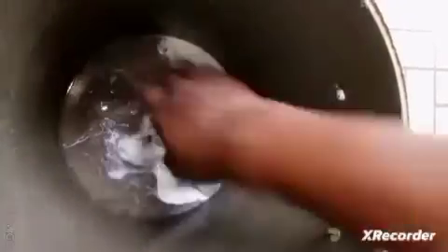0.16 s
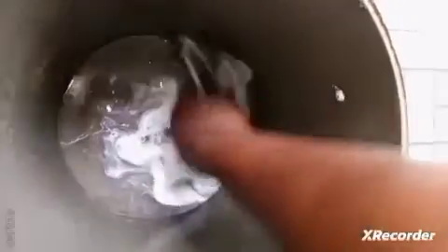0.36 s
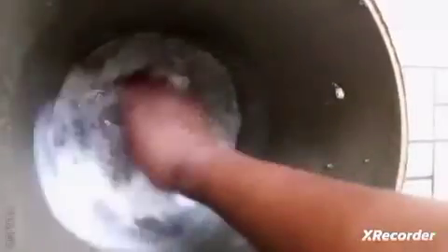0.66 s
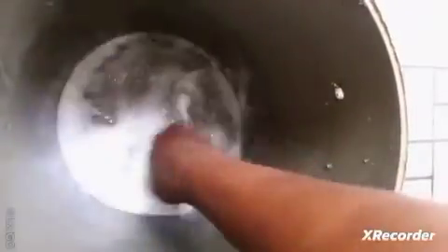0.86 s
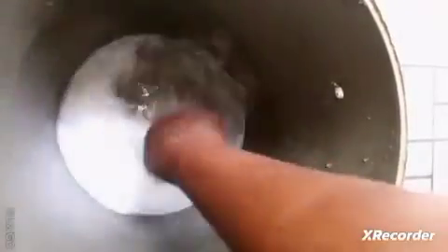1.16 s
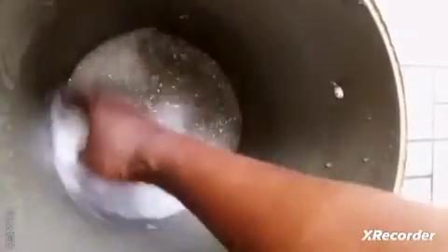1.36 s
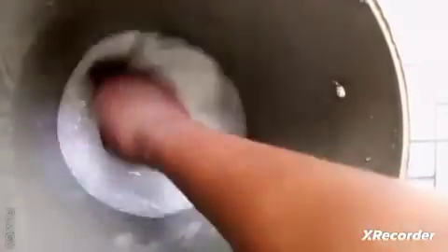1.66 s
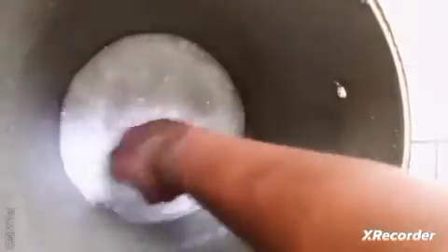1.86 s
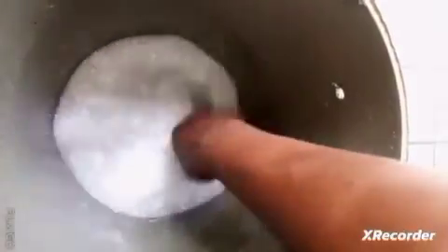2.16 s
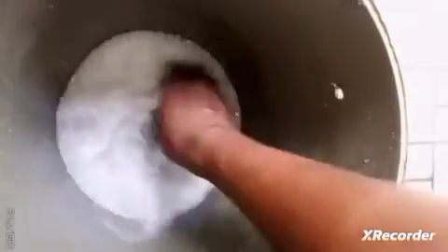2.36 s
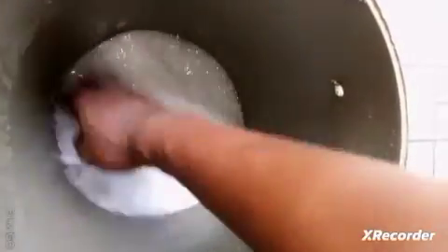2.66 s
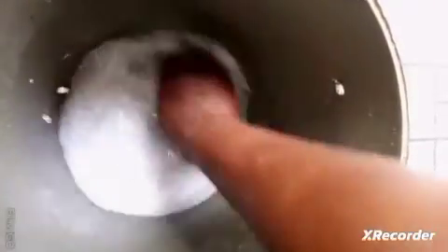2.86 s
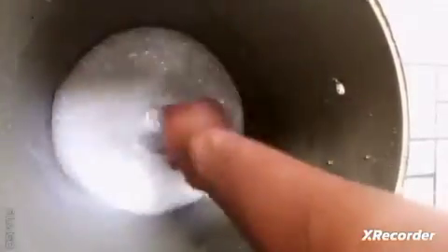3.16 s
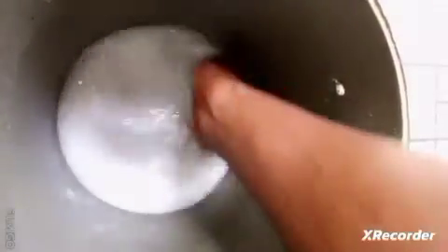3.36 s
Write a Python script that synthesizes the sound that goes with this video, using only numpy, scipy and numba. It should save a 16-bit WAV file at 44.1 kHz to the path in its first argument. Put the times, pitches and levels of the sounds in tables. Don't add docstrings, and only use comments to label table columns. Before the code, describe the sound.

Shallow water is stirred by hand in a bucket: a brief quiet lead-in, a sharp first splash, then continuous churning, glugs and bubbly splashes with dull hollow thumps, miked close over the rim outdoors.

```python
import sys
import numpy as np
from scipy import signal
from scipy.fft import rfft, irfft
from scipy.io import wavfile
from scipy.ndimage import uniform_filter1d, minimum_filter1d
from numba import njit

SR = 44100
rng = np.random.default_rng(int(sys.argv[2]) if len(sys.argv) > 2 else 0)


def unload_audio(sound):
    columns = np.transpose(np.atleast_2d(sound))
    steps = np.round(np.clip(columns, -1, 1) * 32767)
    wavfile.write(sys.argv[1], SR, steps.astype(np.int16))


def ratio_of_db(decibels):
    return 10 ** (np.asarray(decibels, float) / 20)


N = 154350

BUBBLE_GLIDE, BUBBLE_SWELL_CYCLES = 0.035, 2.13
SURGE_DB = 2


def level(x, rms_db):
    return x * ratio_of_db(rms_db) / np.sqrt(np.mean(x ** 2))


def colour(x, points):
    hz, db = np.array(points, float).T
    grid_hz = np.arange(1025) * SR / 2048
    gain_db = np.interp(np.log(grid_hz + 1), np.log(hz), db)
    cepstrum = irfft(gain_db * np.log(10) / 20)
    cepstrum[1:1024] *= 2
    cepstrum[1025:] = 0
    impulse = irfft(np.exp(rfft(cepstrum)))
    return signal.fftconvolve(x, impulse)[:N]


def band(x, hz, width_hz):
    return signal.lfilter(*signal.iirpeak(hz, hz / width_hz, SR), x)


def band_twice(x, hz, width_hz):
    return band(band(x, hz, width_hz), hz, width_hz)


def cut(x, hz, kind, order):
    return signal.sosfilt(signal.butter(order, hz, kind, fs=SR, output="sos"), x)


def walk(rate_hz):
    hold = int(SR / rate_hz)
    steps = np.repeat(rng.standard_normal(N // hold + 1), hold)
    return 1.3 * uniform_filter1d(uniform_filter1d(steps, hold), hold)[:N]


def bursts(rows, decay_s, rise_s):
    kicks = np.zeros(N)
    kicks[(rows[:, 0] * SR).astype(int)] = ratio_of_db(rows[:, 1])
    n = int(rise_s * SR)
    rise = np.convolve(kicks, np.hanning(n) * 2 / n)[n // 3:n // 3 + N]
    return signal.lfilter([1], [1, -np.exp(-1 / (decay_s * SR))], rise)


@njit
def ring(start_s, hz, cycles, size, glide, swell_cycles):
    out = np.zeros(N)
    for k in range(len(start_s)):
        n0 = int(start_s[k] * SR)
        tau = cycles[k] / hz[k] * SR / 2
        phase = 0.0
        for i in range(min(int(5 * tau), N - n0)):
            phase += 2 * np.pi * hz[k] * (1 + glide[k] * i / tau / 2) / SR
            swell = min(i * hz[k] / SR / swell_cycles, 1.0)
            out[n0 + i] += size[k] * np.exp(-i / tau) * swell * np.sin(phase)
    return out


def cluster(rows, cycles, spread_s, gain_db):
    bubbles, swarm_db, lead_db = 12, -7, 8.5
    when, pitch, strength, life = np.moveaxis(rng.random((len(rows), bubbles, 4)), 2, 0)
    late_s = -spread_s * np.log(1 - when)
    size = ratio_of_db(rows[:, 1:2] + gain_db + swarm_db + 11 * strength) * np.exp(-late_s / spread_s / 2)
    hz = rows[:, 2:3] * 2 ** (1.497 * (pitch - 0.55))
    late_s -= 0.001
    late_s[:, 0] = 0
    size[:, 0] = ratio_of_db(rows[:, 1] + gain_db + lead_db)
    hz[:, 0] = 0.99 * rows[:, 2]
    life[:, 0] = 1
    start_s = rows[:, :1] + late_s
    cycles = cycles * (0.95 + 0.63 * life)
    return ring(start_s.ravel(), hz.ravel(), cycles.ravel(), size.ravel(),
                BUBBLE_GLIDE * life.ravel(), BUBBLE_SWELL_CYCLES)


# (time [s], peak level [dB], pitch [Hz])
SPLASHES_EARLY = [(0.3312, -15, 2740), (0.3931, 0, 3400), (0.4845, -26, 3400), (0.5852, -35, 3600),
                  (0.611, -40, 3600), (0.6221, -8.5, 3160), (0.7234, -8, 4050), (0.7618, -23, 3020),
                  (0.797, -34, 2730), (0.9234, -22, 3530), (0.9588, -1.5, 3160), (1.0017, -4.5, 2420),
                  (1.0589, -6, 3260), (1.099, -8.5, 2550), (1.117, -15, 3300), (1.1386, -4, 3350),
                  (1.1782, -13.5, 3750), (1.218, -10, 2900), (1.2404, -8, 3430), (1.2806, -9, 3720),
                  (1.31, -40, 3170), (1.3335, -0.5, 2227), (1.4343, -9.5, 2280), (1.4748, -16, 3130),
                  (1.517, -11, 4000), (1.558, -3, 2434), (1.6039, -8, 2510), (1.6304, -3.5, 3530),
                  (1.6957, -11, 3500), (1.7126, -6.5, 2010), (1.745, -4, 3250), (1.7798, -9, 3400)]
SPLASHES_LATE = [(1.847, -9.5, 3270), (1.926, -17, 2520), (1.962, -22, 3300), (1.9743, -10, 4300),
                 (2.0353, -16, 2500), (2.0727, -27, 4270), (2.1004, -18.5, 3530), (2.1414, -1, 2890),
                 (2.2289, -5.5, 2870), (2.2656, -1, 2435), (2.375, -4, 3090), (2.401, -14, 3780),
                 (2.4678, -17, 3710), (2.5152, -8.5, 2230), (2.623, -5.5, 3480), (2.7082, -10.5, 3370),
                 (2.7447, -22, 3200), (2.778, -42, 2330), (2.8261, -9.5, 3470), (2.8811, -12, 3260),
                 (3.0173, -9, 2580), (3.056, -5, 2075), (3.1012, 6, 2870), (3.1907, -6.5, 3330),
                 (3.312, -23, 3930), (3.3328, -9, 3290), (3.4206, -8, 2780), (3.485, -11.5, 2600)]


def splashes():
    rows = np.array(SPLASHES_EARLY + SPLASHES_LATE)
    return cluster(rows, cycles=19.6, spread_s=0.0073, gain_db=-7.5)


# (time [s], peak level [dB], pitch [Hz])
GLUGS = [(0.33, -2.5, 1484), (0.486, -9, 766), (0.521, -3.5, 831), (0.637, -13, 1044),
         (0.708, -9, 705), (0.809, -9.5, 1570), (0.828, -11, 804), (0.847, -8, 1016),
         (0.92, -13, 1490), (0.961, -12, 1420), (1.002, -34, 1400), (1.184, -11.5, 1030),
         (1.24, -9.5, 1500), (1.309, -12.5, 772), (1.347, -13.5, 1650), (1.432, -3, 1785),
         (1.524, -10, 1950), (1.594, -12, 1440), (1.692, -14.5, 1800), (1.708, -9, 1820),
         (1.775, -8, 1810),
         (1.943, -10.5, 1490), (1.971, -11, 942), (1.994, -8, 1116), (2.059, -14, 1083),
              (2.14, -14, 1062), (2.226, -9, 1310), (2.265, -6, 1633), (2.514, -12, 1730),
              (2.681, -18, 1440), (2.749, -15, 1290), (2.775, -12, 1470), (2.801, -6.5, 1455),
              (2.833, -10, 1058), (2.867, -5, 1650), (2.941, -32.5, 725), (2.995, -12.5, 872),
              (3.027, -4.5, 1510), (3.099, 3, 1594), (3.329, -20, 1030)]


def glugs():
    rows = np.array(GLUGS)
    return cluster(rows, cycles=8.7, spread_s=0.014, gain_db=-2.36)


# (time [s], churn level [dB], spray relative level [dB])
STIRRING = [(.326, -21.5, -19), (0.398, -4.5, 7), (0.434, -20, 2), (0.498, -10.5, -2), (.72, -11, 1),
            (.9, -17.5, 3), (1.3, -17.5, 0), (1.75, -18.5, -7), (1.9, -22.5, 3.5), (2.029, -15.5, -2.5),
            (2.12, -24, -14), (2.372, -14, 1), (2.429, -32.5, -13), (2.6, -20.5, 4), (2.65, -16.5, 7),
            (3.122, -16, 1.5), (3.28, -24.5, 3), (3.5, -27, -31)]


def effort_db(column):
    rows = np.array(STIRRING, float)
    return np.interp(np.arange(N) / SR, rows[:, 0], rows[:, column], left=-99)


# (frequency [Hz], level [dB per Hz])
WATER_SPECTRUM = [(300, -65.5), (540, -13), (720, 1), (1210, -1), (1430, 3.5), (3340, 0), (4500, -9),
                  (7500, -33)]


def churn():
    bubbles_per_s, fizz_cycles, scatter_db, patch_db = 3600, 13.1, 2.6, 3.2
    when, pitch, strength, life = rng.random((int(bubbles_per_s * N / SR), 4)).T
    hz = 450 * 14 ** pitch
    surges = np.array([walk(35) for _ in range(6)])
    patch = surges[(pitch * 6).astype(int), (when * N).astype(int)]
    size = ratio_of_db(-scatter_db * np.log(1 - 0.99 * strength) + patch_db * patch) * hz
    cycles = fizz_cycles * (0.72 + 1.07 * life)
    fizz = ring(when * N / SR, hz, cycles, size, BUBBLE_GLIDE * life, BUBBLE_SWELL_CYCLES)
    wash = level(rng.standard_normal(N), -4)
    bed = level(colour(level(fizz, 0) + wash, WATER_SPECTRUM), -1)
    wake = ratio_of_db(-11.5) * bursts(np.array(SPLASHES_EARLY + SPLASHES_LATE), decay_s=0.019, rise_s=0.0047)
    return bed * (ratio_of_db(effort_db(1) + SURGE_DB * walk(50)) + wake)


# (time [s], peak level [dB])
SPRAY_BURSTS = [(0.333, -53), (0.345, -24), (0.362, -19), (0.5473, -23), (0.581, -16.5), (0.6455, -22),
                (0.6705, -29), (1.007, -20), (1.2482, -23), (1.342, -19.5), (1.4333, -34), (1.4896, -22.5),
                (1.69, -23), (1.763, -22), (1.826, -21.5), (1.9261, -44), (2.0209, -31), (2.0369, -22),
                (2.1012, -26), (2.1456, -20), (2.333, -23.5), (2.4021, -22), (2.5861, -45), (2.6265, -20.5),
                (2.7992, -55), (2.868, -53), (3.0471, -24), (3.1229, -27), (3.1558, -21.5), (3.329, -18)]
# (frequency [Hz], level [dB per Hz])
SPRAY_SPECTRUM = [(5000, -5.5), (7000, -23), (9200, -21), (13300, -26), (14900, 2), (15800, -6.5),
                  (16100, -71)]


def spray(water):
    hit, strength = rng.random((2, N))
    ticks = (hit < 0.3) * ratio_of_db(-3 * np.log(1 - 0.99 * strength)) * rng.standard_normal(N)
    follow = np.sqrt(uniform_filter1d(water ** 2, size=300).clip(0))
    steady = ratio_of_db(-32 + effort_db(2) + SURGE_DB / 2 * walk(47)) * follow
    thick = ratio_of_db(-14.5) * bursts(np.array(SPRAY_BURSTS), decay_s=0.023, rise_s=0.008)
    crackle = band(ticks, 15960, 3000)
    for hz in range(6400, 13000, 1600):
        crackle = crackle + band_twice(ticks, hz, 2200) * ratio_of_db(4 * walk(90))
    return level(colour(crackle, SPRAY_SPECTRUM), 0) * (steady + thick)


# (time [s], peak level [dB], pitch [Hz], length [s], slap level [dB])
SLOPS = [(0.347, -19, 274.5, 0.035, -21.5), (0.416, -26.5, 244, 0.12, -46), (0.488, -14, 270, 0.056, -21.5),
         (0.556, -16, 234, 0.038, -27.5), (0.636, -26, 243, 0.097, -40), (0.702, -23.5, 245, 0.042, -27.5),
         (0.851, -23, 246, 0.044, -21), (0.92, -23, 244, 0.05, -37), (0.99, -25, 240, 0.051, -45),
         (1.234, -20, 242, 0.066, -22.5), (1.372, -28.5, 249, 0.12, -33.5),
         (1.472, -30.5, 244, 0.077, -32.5), (1.527, -33, 253, 0.14, -30), (1.579, -37, 253, 0.045, -45),
         (1.722, -10.5, 255, 0.062, -19.5), (1.96, -28, 226, 0.05, -54), (2.023, -24, 262, 0.036, -30.5),
         (2.049, -16, 250, 0.047, -53), (2.198, -26, 240, 0.11, -37), (2.28, -24, 269, 0.066, -30.5),
         (2.358, -26, 240, 0.06, -30), (2.485, -22, 240, 0.1, -69), (2.617, -16.5, 249, 0.085, -42),
         (2.765, -23.5, 236, 0.11, -55), (2.966, -23.5, 254.4, 0.15, -25.5),
         (3.048, -23.5, 240, 0.077, -30), (3.14, -28.5, 239, 0.11, -43), (3.337, -27.5, 232, 0.062, -54)]


def gulps():
    gain_db, sag, rise_s, ripple_db = -2.5, 0.02, 0.007, 3
    out = np.zeros(N)
    for start_s, peak_db, hz, length_s, _ in SLOPS:
        t = np.arange(int(np.clip(length_s, 0.02, 0.2) * SR)) / SR
        part = t / t[-1]
        shape = np.minimum(t / rise_s, 1) * np.cos(np.pi / 2 * part).clip(0) ** 1.08
        i = int((start_s - 0.004) * SR)
        out[i:i + len(t)] += ratio_of_db(peak_db + gain_db) * shape * np.sin(2 * np.pi * hz * t * (1 - sag * part))
    return out * ratio_of_db(ripple_db / 2 * walk(50))


# (frequency [Hz], level [dB], t60 [s])
BUCKET_MODES = [(240, 4, 0.069), (297, 1, 0.047), (322, -9, 0.025)]


def bucket():
    rows = np.array(SLOPS)
    out = gulps()
    rush = rng.standard_normal(N) * ratio_of_db(-36.5 + 3 * walk(40))
    push = rush * (bursts(rows, decay_s=0.024, rise_s=0.013) + ratio_of_db(effort_db(1) - 20.5))
    for hz, db, t60_s in BUCKET_MODES:
        pole = np.exp(2j * np.pi * hz / SR - np.log(1000) / (t60_s * SR))
        out = out + ratio_of_db(db) * signal.lfilter([1], [1, -pole], push).imag
    slap_env = bursts(rows[:, [0, 4]], decay_s=0.02, rise_s=0.002)
    slap = rng.standard_normal(N) * slap_env * ratio_of_db(19)
    out = out + band_twice(slap, 434, 380)
    return cut(out, 190.4, "high", order=4)


# (frequency [Hz], width [Hz], level [dB])
AIR_MODES = [(762, 88, -13), (1026, 35.3, -2), (1404, 38, -7), (3670, 1130, 0)]


def hollow(water):
    return ratio_of_db(-3.5) * sum(ratio_of_db(db) * band(water, hz, width_hz) for hz, width_hz, db in AIR_MODES)


def far_wall(water):
    echo_s, echo_db = 0.002288, -27
    feedback = np.r_[1, np.zeros(int(echo_s * SR)), -ratio_of_db(echo_db)]
    return 0.4 * signal.lfilter([1], feedback, water)


def side_signal(mist):
    scatter = rng.standard_normal(N) * uniform_filter1d(np.abs(mist), size=200)
    scatter = ratio_of_db(-11.5) * cut(scatter, [6500, 13500], "band", order=3)
    rumble = level(cut(rng.standard_normal(N), 90, "low", order=3), -89)
    return scatter + rumble


# (frequency [Hz], level [dB per Hz])
YARD_SPECTRUM = [(25, -18.5), (85, 2), (200, -2.5), (500, -14), (900, -25), (3500, -22.5), (5200, -33),
                 (7000, -83)]
# (frequency [Hz], width [Hz], level [dB], loudest time [s])
DISTANT_WHINES = [(1835, 73, -61, 0.014), (1076, 120, -67.5, 0.23), (3400, 74, -84, 0.22),
                  (2480, 220, -82.5, 0.22)]


def yard():
    rumble_db, sway_db, swell_s = -60, 2.5, 0.056
    out = level(colour(rng.standard_normal(N), YARD_SPECTRUM), rumble_db) * ratio_of_db(sway_db * walk(5.74))
    for hz, width_hz, db, peak_s in DISTANT_WHINES:
        swell_db = 13 * np.exp(-((np.arange(N) / SR - peak_s) / swell_s) ** 2)
        whine = level(band_twice(rng.standard_normal(N), hz, width_hz), db)
        out = out + whine * ratio_of_db(swell_db)
    return out


def scene():
    drops = cut(splashes() + glugs(), 5000, "low", order=6)
    water = churn() + cut(drops, 466, "high", order=4)
    mist = spray(water)
    mid = far_wall(water) + hollow(water) + mist + bucket() + yard()
    side = side_signal(mist)
    return np.array([mid + side, mid - side])


def top_cut(x):
    return signal.sosfilt(signal.butter(12, 16850, fs=SR, output="sos"), x)


def record(dry):
    limit, top_hz = 0.8, 15950
    peak = np.abs(dry).max(axis=0)
    gain = minimum_filter1d(limit / np.maximum(peak, limit), size=161)
    held = dry * uniform_filter1d(gain, size=80)
    low_pass = signal.ellip(8, 0.2, 60, top_hz, fs=SR, output="sos")
    mix = signal.sosfilt(low_pass, held)
    return top_cut(mix)


dry = scene()
out = record(dry)
unload_audio(out)
```